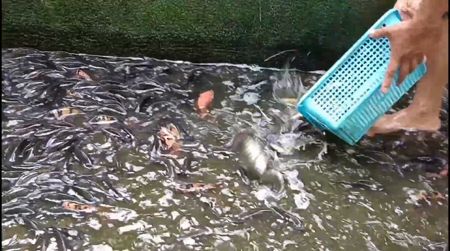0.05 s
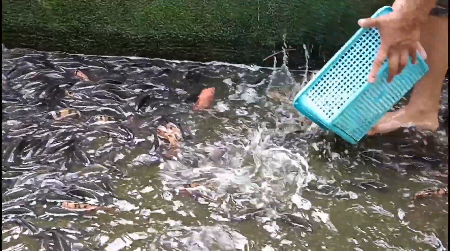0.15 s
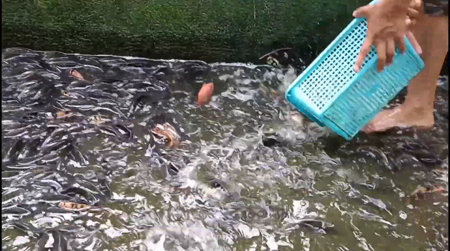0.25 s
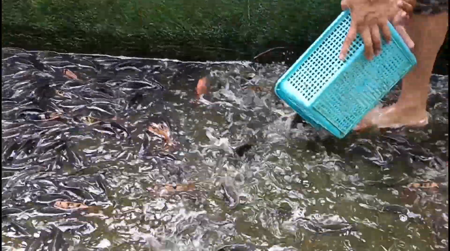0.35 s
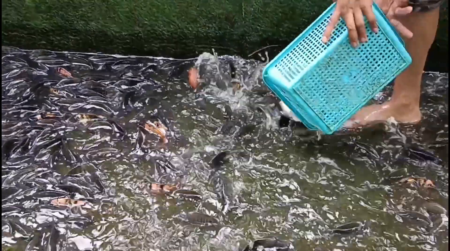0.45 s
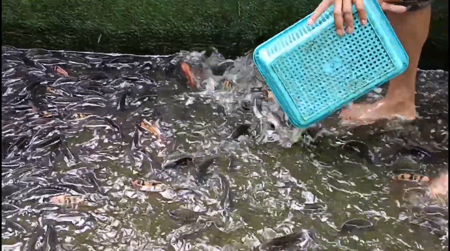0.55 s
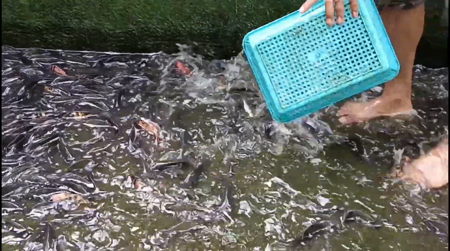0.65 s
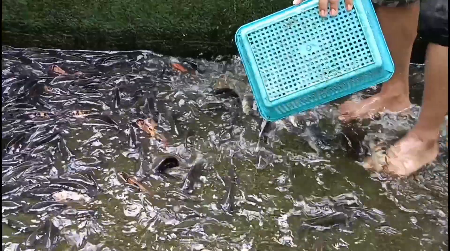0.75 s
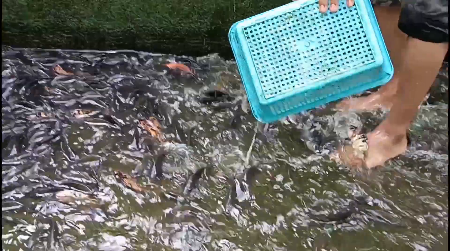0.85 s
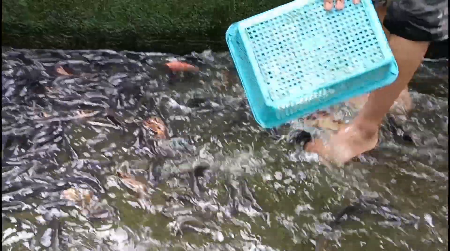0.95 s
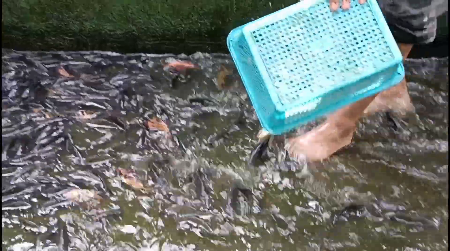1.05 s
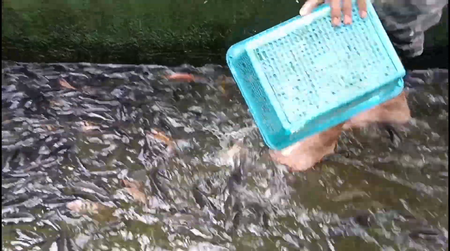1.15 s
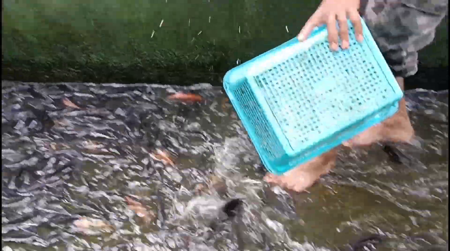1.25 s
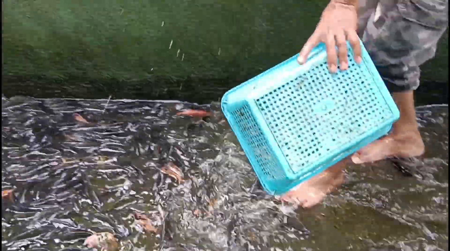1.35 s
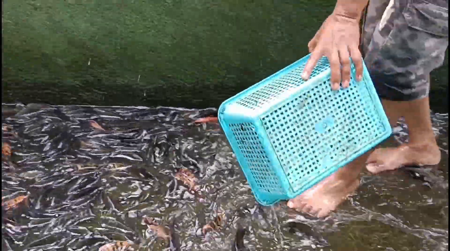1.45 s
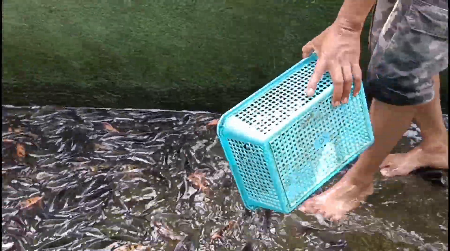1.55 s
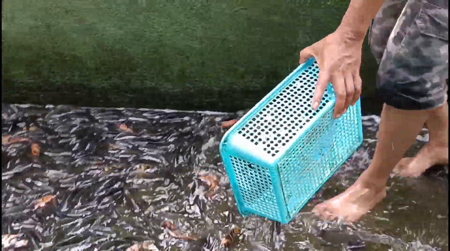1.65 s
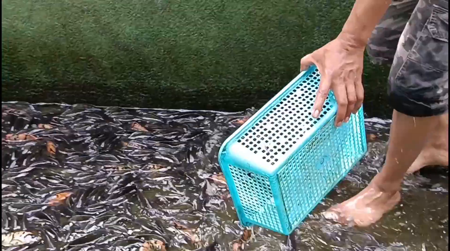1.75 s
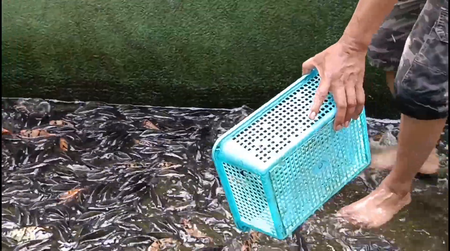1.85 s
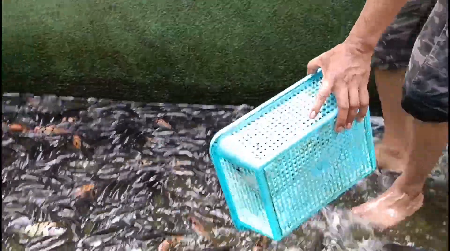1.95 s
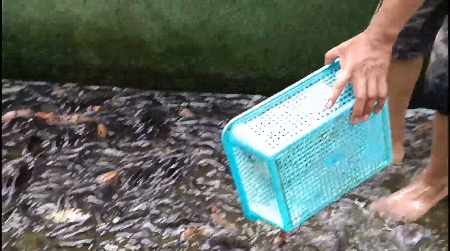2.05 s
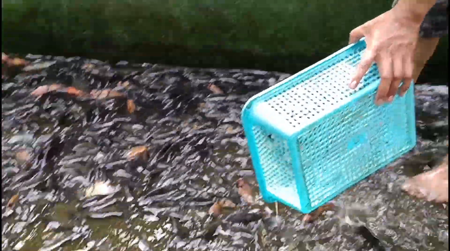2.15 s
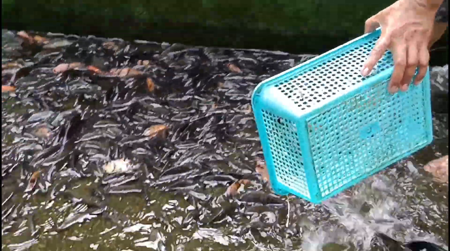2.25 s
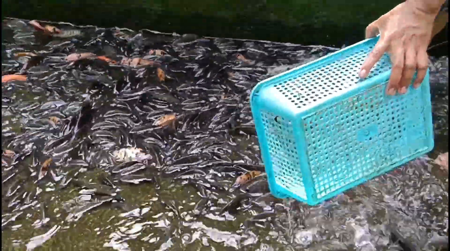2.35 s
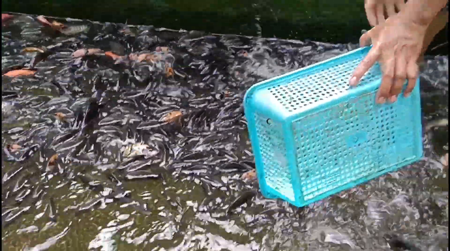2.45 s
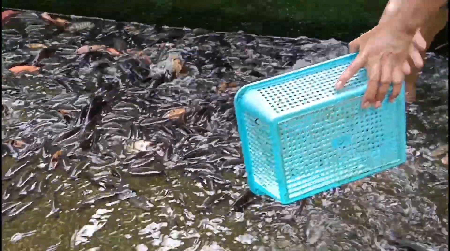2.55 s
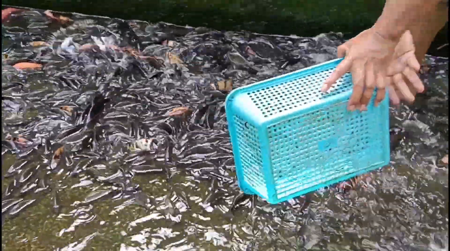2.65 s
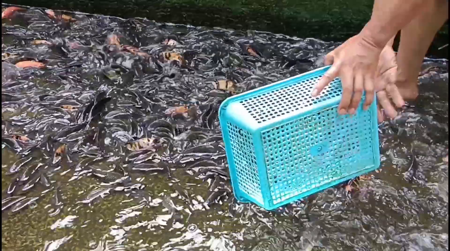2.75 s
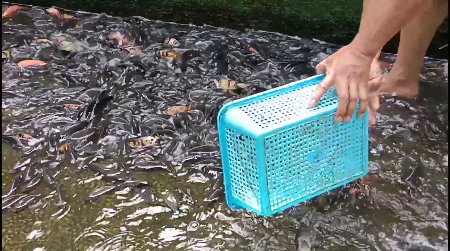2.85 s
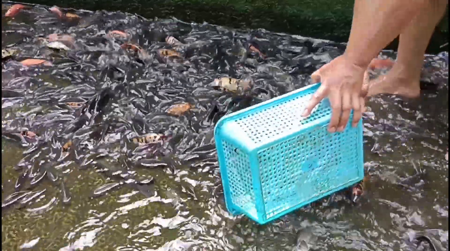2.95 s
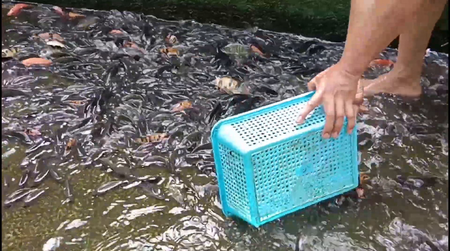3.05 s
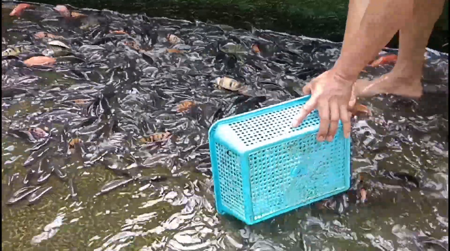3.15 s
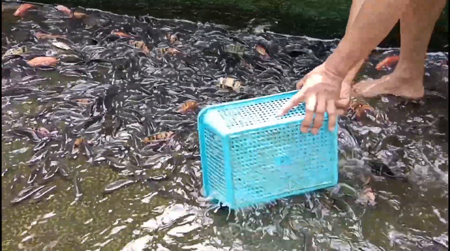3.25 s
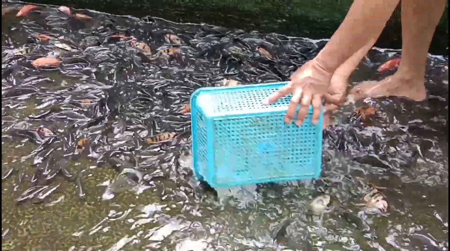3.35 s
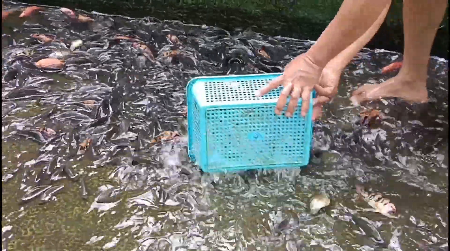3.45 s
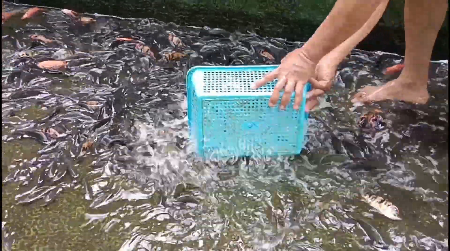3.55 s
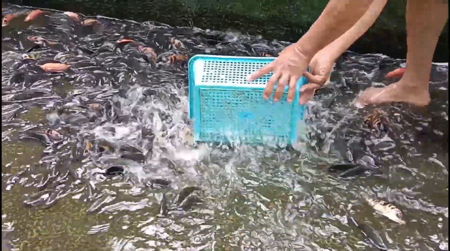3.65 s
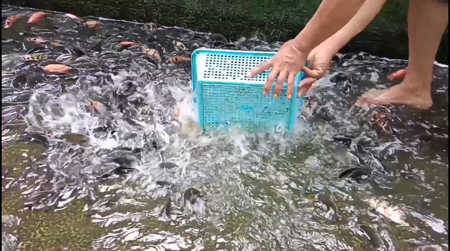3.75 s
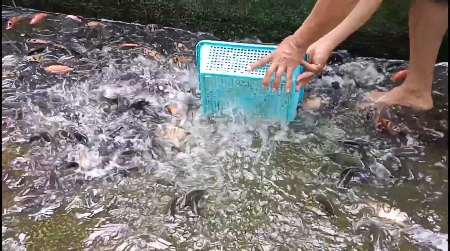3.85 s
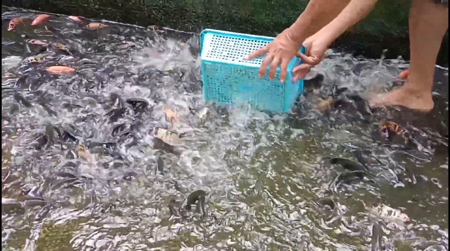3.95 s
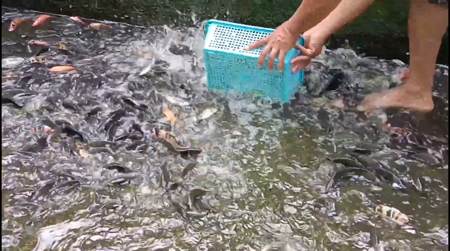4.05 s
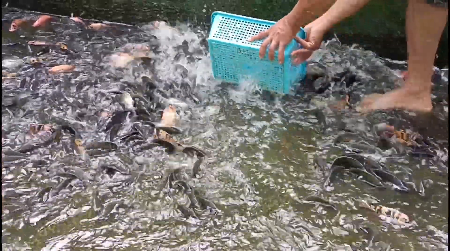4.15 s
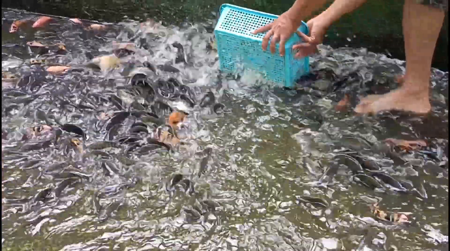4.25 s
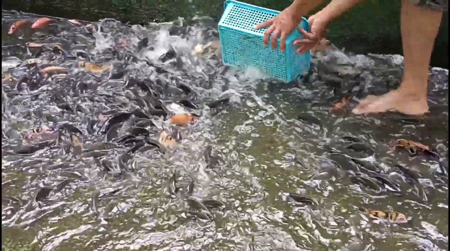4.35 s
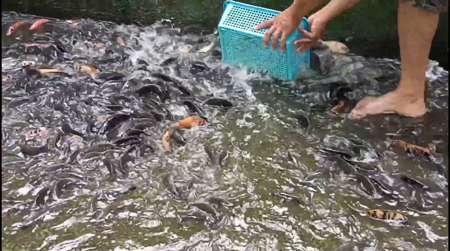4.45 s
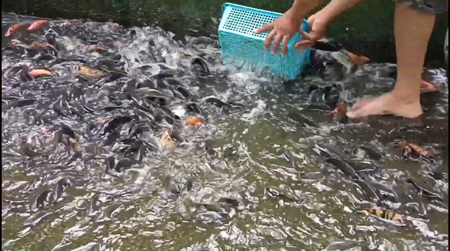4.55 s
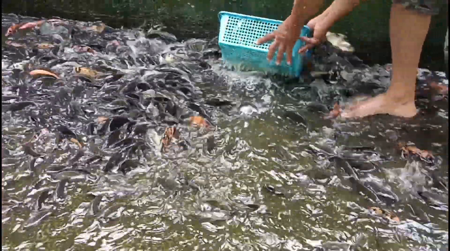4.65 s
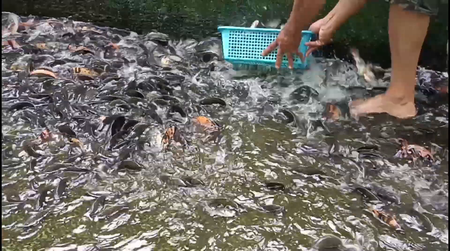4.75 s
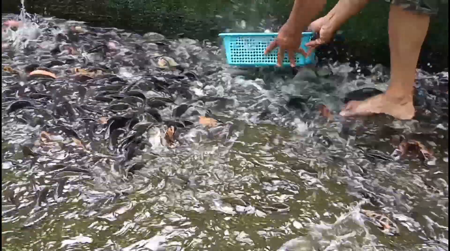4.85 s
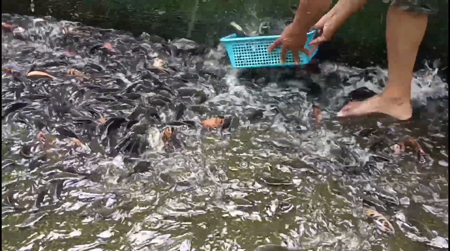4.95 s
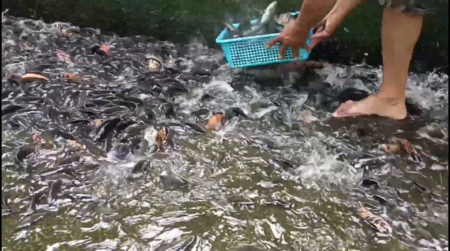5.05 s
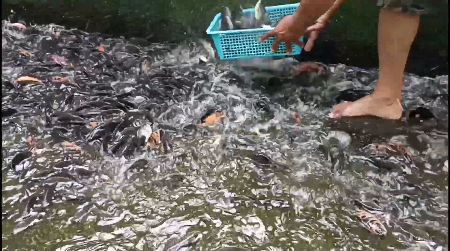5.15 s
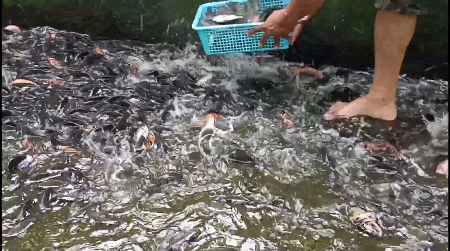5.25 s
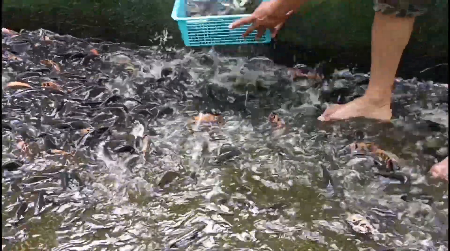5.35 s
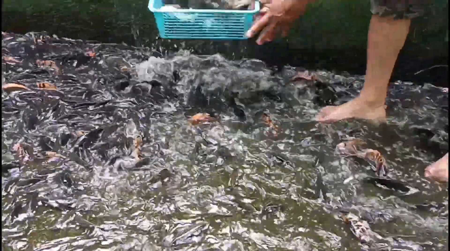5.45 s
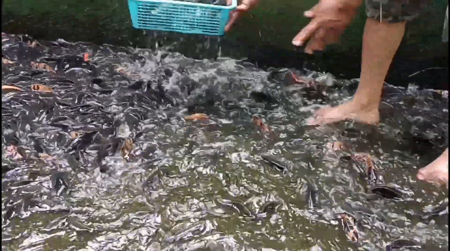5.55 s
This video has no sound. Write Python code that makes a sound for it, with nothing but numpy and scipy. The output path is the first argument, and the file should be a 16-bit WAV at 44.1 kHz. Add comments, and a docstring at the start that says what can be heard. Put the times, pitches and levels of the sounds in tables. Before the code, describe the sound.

From the start, crowded fish thrash in a shallow concrete pond, heard from nearby on a hand-held camera microphone. The splashing is continuous, thin and bright: hissing spray, falling drops and small bubbles, with irregular sharp tail slaps, quick fizzes and occasional plops. Echoes off the walls are very short, and faint dull thuds come through the floor. Soft swirls of water pass in the first second or so. Between about 1.6 and 2 seconds the splashing eases and a faint, high, wavering whistle sounds. The slapping then picks up again. From about 3.4 seconds a plastic basket is pushed through the fish and lifted, making a low, lumpy slosh that swells at 3.7 seconds with deeper plops. The thrashing grows louder and fuller with it. The slosh is heaviest around 4.7 seconds, and strong spray and slaps continue to the end at about 5.6 seconds.

```python
"""Crowded fish thrash in a shallow concrete pond, making spray, falling drops, bubbles and tail slaps.
Spray hisses, trapped air rings and dull thuds come through the floor; a faint whistle sounds in a lull.
From about 3.4 s a plastic basket is pushed through the fish and lifted, sloshing heavy water.
Until then the sound is thin: little is left under an edge that wanders around 1 kHz.
It all reaches the two unlike microphone ports of a hand-held camera."""
import sys
import numpy as np
from scipy import signal
from scipy.io import wavfile
from scipy.ndimage import uniform_filter1d

SR = 44100
rng = np.random.default_rng(int(sys.argv[2]) if len(sys.argv) > 2 else 0)


def to_wav(sig):
    """Store sig (one row per channel, or 1-D mono) as 16-bit WAV at the path in sys.argv[1].

    Samples outside -1..1 are clipped; the rate is SR.
    """
    pcm = np.clip(np.atleast_2d(sig), -1, 1) * 32767
    pcm = np.round(pcm).astype(np.int16)
    wavfile.write(sys.argv[1], SR, pcm.T)  # frames by channels


N = 246959

# How the thrashing changes: t/s, level/dB, treble boost/dB, body boost/dB, low edge/Hz
THRASHING = [(0.0, -33.5, -2, -9, 1280), (.14, -36, 1.5, -3, 1460), (.2, -34.5, 1.5, -1, 990),
             (.3, -31.5, -2.5, 3.5, 780), (.4, -34, -3, 2, 840), (.56, -36.5, 0, 1.5, 730),
             (.72, -35.5, 0, -3, 1090), (.84, -37.5, 0, 0, 1290), (.9, -38, -2, 1, 855),
             (1.05, -38, 2.5, 2.5, 790), (1.085, -33.5, -2, 6.5, 810), (1.2, -35, -1.5, -4.5, 680),
             (1.3, -37, 0.5, 0, 940), (1.5, -36.5, -4.5, -7, 1010), (1.63, -41, 1, -5, 1320),
             (1.8, -40.5, 3.5, -9, 1280), (1.92, -43.5, 5.5, -2.5, 1350), (2.03, -41.5, 3.5, -2, 1450),
             (2.07, -34.5, -6, 1, 1066), (2.17, -41.5, 2.5, -3, 980), (2.26, -38.5, -1.5, -3.5, 1300),
             (2.4, -37, -2, -2, 990), (2.53, -34.5, -6.5, 2.5, 700), (2.72, -33, -2, -1.5, 1030),
             (2.9, -38, -1.5, 0, 985), (3.04, -36, 0.5, -4, 1020), (3.17, -43, -1, -3, 1320),
             (3.235, -38, 1, -5, 1010), (3.27, -36, -5.5, 1.5, 970), (3.43, -35, -0.5, -1, 990),
             (3.56, -34.5, -4, 4, 790), (3.67, -29.5, -1.5, 2.5, 690), (4.3, -30.5, 0, 2.5, 626),
             (4.62, -31.5, -1.5, 1, 710), (4.89, -28, -0.5, -2, 600), (5.02, -31, 2, 0.5, 610),
             (5.25, -27, 0.5, -3, 665), (5.4, -30, 3.5, -0.5, 740), (5.6, -28.5, 2, -6, 740)]
# Heavy water pushed by the basket: t/s, level/dB, deep bass boost/dB
BASKET_PUSH = [(0.0, -73.5, -8), (3.34, -76.5, -2.5), (3.385, -43.5, -27), (3.47, -58, -12),
               (3.58, -55, -28), (3.655, -36.5, -22), (4.15, -40.5, -26), (4.23, -35, -17),
               (4.5, -38.5, -10.5), (4.7, -32.5, -4.5), (4.85, -38, -7.5), (5.07, -34, -16),
               (5.24, -37, -5.5), (5.36, -37, -10.5), (5.44, -45.5, -0.5), (5.6, -45, -5)]


def amp(db):
    return 10 ** (np.asarray(db) / 20)


def unit_level(x):
    return x / np.sqrt(np.mean(x ** 2) + 1e-20)


def at_pitch(points, hz):
    f, value = np.transpose(points)
    return np.interp(np.log(hz + 1), np.log(f + 1), value)


def at_time(rows, t):
    times, *columns = np.transpose(rows)
    return [np.interp(t, times, column) for column in columns]


def pan(left_minus_right_db):
    return amp(np.array([left_minus_right_db, -left_minus_right_db]) / 2)


def wobble(shape, size):
    """Smooth random drift; a bigger size drifts more slowly."""
    return unit_level(uniform_filter1d(rng.standard_normal(shape), size))


def add_at(mix, start_s, sound):
    part = mix[:, round(start_s * SR):][:, :sound.shape[1]]
    part += sound[:, :part.shape[1]]


def fade(t, t60, rise_s):
    """Rises quickly and falls by 60 dB every t60 seconds."""
    return amp(-60 * t / t60) * (1 - np.exp(-t / rise_s))


def filtered(x, gain, size):
    """Turns each pitch at each moment up or down by gain(hz, t)."""
    frames = dict(fs=SR, nperseg=size, noverlap=size * 3 // 4)
    hz, t, spectra = signal.stft(x, **frames)
    return signal.istft(spectra * gain(hz[:, None], t), **frames)[1][..., :N]


def water_noise(patchy_db, flicker_db, size):
    """Stereo hiss with drifting patches and a flicker that all pitches share."""
    # How alike the two sides are: f/Hz, likeness/0-1
    likeness = [(60, 0.78), (180, 1), (550, 0.58), (1650, 0.42), (4970, 0.07), (15000, 0.0)]
    left, other = rng.standard_normal((2, N))
    bins, frames = size // 2 + 1, N * 4 // size + 8
    patches = unit_level(uniform_filter1d(wobble((bins, frames), size=12), size=5, axis=0))
    flicker = wobble(frames, size=4)
    gain = lambda hz, t: amp(patchy_db * patches + flicker_db * flicker)[:, :len(t)]
    alike = lambda hz, t: np.clip(at_pitch(likeness, hz), 0, .99)
    unlike = lambda hz, t: np.sqrt(1 - alike(hz, t) ** 2)
    right = filtered(left, alike, size=1024) + filtered(other, unlike, size=1024)
    return unit_level(filtered(np.array([left, right]), gain, size))


def bubble(hz, cycles, rise=0.0876):
    """An air pocket rings, shrinking so that its pitch climbs."""
    turns = np.arange(int(3 * cycles * SR / hz) + 4) * hz / SR
    note = np.sin(2 * np.pi * turns * (1 + rise * turns / cycles))
    ring = note * np.exp(-2 * turns / cycles) * (1 - np.exp(-4 * turns))
    return ring / np.linalg.norm(ring)


def bubble_cloud(lo_hz, hi_hz, cycles, per_s, spread_db, busy, sizes):
    """Many bubbles, each size at its own place in the pond; a few are loud."""
    out = np.zeros((2, N))
    for hz in np.geomspace(lo_hz, hi_hz, sizes):
        pops = 1. * (rng.random(N) < busy * per_s / sizes / SR)
        pops[pops > 0] = amp(spread_db * np.minimum(rng.exponential(1, int(pops.sum())), 3.2))
        ring = bubble(hz, cycles * rng.uniform(1.0, 1.86))
        sound = signal.oaconvolve(pops, ring)[:N] * np.sqrt(hz)
        place = rng.uniform(-1, 1)  # the far side is quieter and later
        out += pan(4 * place)[:, None] * np.array([sound, np.roll(sound, int(14 * place))])
    return unit_level(out)


def wall_echoes(x, t60):
    """Short echoes off the water and pond walls, different on each side."""
    t = np.arange(int(t60 * SR)) / SR
    echoes = rng.standard_normal((2, len(t))) * (rng.random((2, len(t))) < .06)
    echoes *= amp(-60 * t / t60) * (t > .001)
    return signal.oaconvolve(x, echoes / np.linalg.norm(echoes[0]), axes=1)[:, :N]


def thrashing():
    """Spray hiss, drops and bubbles; they come in clumps as fish flip."""
    busy = amp(3 * wobble(N, size=900))
    busy /= busy.mean()
    drops = amp(-6) * bubble_cloud(883, 14750, cycles=1.7, per_s=3000, spread_db=6.2, busy=busy, sizes=26)
    drops += amp(-16.5) * bubble_cloud(800, 3644, 13.2, 200, 3.4, busy, sizes=16)  # longer rings
    drops += amp(-8) * bubble_cloud(7600, 16000, 0.7, 270, 4.8, busy, sizes=4)  # tiny clicks
    hiss = water_noise(patchy_db=2.73, flicker_db=0.67, size=256)
    water = amp(12.5) * hiss + amp(11.5) * drops + amp(9.5) * wall_echoes(drops, t60=.05)

    def tone(hz, t):
        level_db, treble_db, body_db, _ = at_time(THRASHING, t)
        treble = np.clip(np.log2(hz / 5500 + 1e-9), 0, 1)
        body = np.clip(np.log2(2900 / (hz + 1)), 0, 1)
        return amp(level_db + treble * treble_db + body * body_db) * pan(-0.3)[:, None, None]
    return filtered(water, tone, size=512)


def swirls():
    """Water swirls around the feet in short rushes, each near one pitch."""
    # Swirls: t/s, length/s, level/dB, f/Hz
    rushes = [(0.0, 0.037, -59, 326), (.17, 0.068, -62.5, 330), (0.299, .09, -60, 600),
              (1.091, 0.16, -61, 583), (2.418, .14, -71.5, 470), (3.429, .17, -51.5, 690)]
    out = np.zeros((2, N))
    for start, length, db, hz in rushes:
        t = np.arange(0, length, 1 / SR)
        shared, left, right = rng.standard_normal((3, len(t)))
        band = signal.butter(2, [0.8 * hz, 1.33 * hz], "band", fs=SR, output="sos")
        rush = unit_level(signal.sosfilt(band, shared + .4 * np.array([left, right])))
        add_at(out, start, amp(db) * np.sqrt(2) * np.sin(np.pi * t / t[-1]) * rush)
    return out


def droplet_burst(t, t60, rise_s, ragged_db):
    """A dying rush of droplets, partly alike on both sides."""
    shared, left, right = rng.standard_normal((3, len(t)))
    ragged = amp(ragged_db * wobble(len(t), size=40))
    return unit_level((.5 * shared + np.array([left, right])) * ragged) * fade(t, t60, rise_s)


def tail_slaps(t60=0.037):
    """A tail hits the water: a smack, then a dull splat with trapped air ringing in it."""
    # Slaps: t/s, relative level/dB, air pocket f/Hz, ring boost/dB
    slaps = [(0.061, -15.5, 2540, -3.5), (0.1446, -16, 2790, -1.5), (0.2017, -23, 2640, -7.5),
             (0.2492, -30, 1210, 7), (0.333, -20, 1650, 1), (0.3517, -22, 1830, 5),
             (0.4403, -18, 1829, -0.5), (0.5294, -19, 1730, 0), (0.7226, -17.5, 2610, 1),
             (0.7945, -18, 2760, -9), (1.062, -12.5, 2930, -6.5), (1.075, -14.5, 1090, 2.5),
             (1.286, -27.5, 1580, 6.5), (1.3123, -15.5, 3120, -8), (1.457, -14, 2850, -0.5),
             (1.5434, -28, 3540, 5), (1.664, -19.5, 2980, -5.5), (2.0498, -13.5, 1610, -17),
             (2.2021, -14, 2480, -15), (2.2934, -12.5, 2950, -21), (2.385, -23.5, 1344, 2.5),
             (2.5113, -28, 2818, -3), (2.768, -17, 2050, -6), (2.8776, -24, 1156, 4),
             (2.915, -18, 2010, -4.5), (3.023, -15.5, 2990, -12), (3.2472, -15.5, 2170, -4),
             (3.2925, -26, 3100, 4), (3.341, -18.5, 3440, -4), (3.5741, -26.5, 3000, 9.5),
             (4.0988, -12.5, 1166, -2), (4.1814, -20, 3230, -4), (4.2444, -14, 1180, -3),
             (4.443, -10.5, 3050, -14), (4.573, -20, 2960, 1), (4.7096, -12.5, 2030, -10),
             (4.8572, -24, 3160, 8), (4.9658, -28, 1180, 5), (5.0394, -15.5, 1524, -3),
             (5.1165, -19, 2750, -8), (5.2253, -19, 2700, -8), (5.396, -16, 3080, -21),
             (5.443, -20, 3000, -8), (5.5794, -34, 3190, -4)]
    out, t = np.zeros((2, N)), np.arange(0, .12, 1 / SR)
    dull = signal.butter(2, [1000, 6500], "band", fs=SR)
    smack = 1 + amp(-1.5 - 60 * t / 0.0034)
    for start, db, hz, ring_db in slaps:
        splat = droplet_burst(t, t60, rise_s=0.00082, ragged_db=4.3) * smack
        ring = amp(ring_db) * np.sin(2 * np.pi * hz * t * (1 + 3 * t)) * fade(t, t60, rise_s=0.00081)
        add_at(out, start, amp(db) * (amp(4.5) * signal.lfilter(*dull, splat) + ring))
    return out


def spray_ticks():
    """Spray thrown close by makes short, bright fizzes."""
    # Ticks: t/s, relative level/dB
    ticks = [(0.0616, -14.5), (0.1155, -26), (0.171, -14), (0.2117, -11), (0.385, -22), (0.574, -13.5),
             (1.1383, -15), (1.2477, -15), (1.393, -19.5), (1.4554, -17), (1.5061, -21.5), (1.5454, -16.5),
             (1.662, -15.5), (1.707, -18), (1.785, -13), (1.927, -21.5), (1.9866, -16), (2.1785, -17),
             (2.3967, -18), (2.594, -19.5), (2.7182, -21), (2.7661, -19), (2.97, -22), (3.0034, -20),
             (3.3725, -20.5), (4.153, -17), (4.3979, -21), (4.4697, -12.5), (4.6882, -12), (4.8219, -17.5),
             (4.8473, -13.5), (4.8963, -18.5), (5.022, -17), (5.1135, -10.5), (5.1587, -13), (5.1771, -12),
             (5.2016, -13), (5.2993, -22), (5.4278, -12.5), (5.5383, -14), (5.5823, -16)]
    out, t = np.zeros((2, N)), np.arange(0, .12, 1 / SR)
    bright = signal.butter(2, 6500, "high", fs=SR)
    for start, db in ticks:
        fizz = droplet_burst(t, t60=0.021, rise_s=0.0006, ragged_db=3.8)
        add_at(out, start, amp(db + 12) * signal.lfilter(*bright, fizz))
    return out


def floor_thuds(swell_s=0.041, fade_s=.014):
    """Dull thuds come through the pond floor, over a faint rumble that grows with the basket's push."""
    # Thuds: t/s, length/s, level/dB
    thuds = [(.071, 0.018, -58), (.6, 0.042, -60), (1.35, .035, -58), (1.42, 0.084, -64), (1.57, .1, -66),
             (2.583, 0.042, -59), (2.64, 0.044, -74), (2.743, .05, -70), (2.966, .025, -68),
             (3.1, .04, -77), (3.333, .15, -62), (3.59, .08, -55), (3.74, .04, -61), (3.91, .11, -58),
             (4.32, 0.54, -55), (4.9, 0.045, -58), (5.04, 0.32, -58), (5.48, 0.084, -54)]
    # Tone of the floor: f/Hz, level/dB
    floor_tone = [(25, -35), (60, -10), (95, 1), (120, 6.5), (160, -24.5), (400, -32)]
    t = np.arange(N) / SR
    noise = water_noise(patchy_db=3.4, flicker_db=0.32, size=2048)
    rumble = unit_level(filtered(noise, lambda hz, t: amp(at_pitch(floor_tone, hz)), size=2048))
    strength = amp(-80.5) + amp(at_time(BASKET_PUSH, t)[0] - 35.5)
    for start, length, db in thuds:
        swell = np.clip((t - start) / swell_s + .5, 0, 1)
        strength += amp(db) * swell * np.exp(-np.maximum(t - start - length, 0) / fade_s)
    return strength * rumble


def plops():
    """Big pockets of air close and ring, wobbling, with a climbing note."""
    # Large bubbles: t/s, relative level/dB, f/Hz
    pockets = [(0.322, -33, 866), (0.505, -32, 1182), (0.53, -32, 1070), (0.887, -32.5, 1025),
               (1.073, -39, 1075), (1.727, -51, 956), (1.788, -55.5, 770), (1.81, -51, 970),
               (2.381, -35, 1258), (2.517, -40, 1210), (2.878, -44, 1184), (3.598, -33, 1284),
               (3.661, -35.5, 513), (3.655, -35, 980), (3.909, -33, 356), (3.934, -43, 335),
               (3.948, -26, 1167), (4.046, -30, 1184), (4.679, -38, 300), (4.7, -40, 427),
               (4.969, -37, 416), (5.041, -38, 520)]
    out, t = np.zeros((2, N)), np.arange(0, .2, 1 / SR)
    soft_start = np.minimum(t / 0.00415, 1) ** 2  # the pocket closes without a knock
    shape = soft_start * fade(t, t60=0.064, rise_s=0.0017)
    for start, db, hz in pockets:
        note = np.sin(2 * np.pi * hz * t * (1 + 1.6 * t)) * amp(0.72 * wobble(len(t), size=150))
        add_at(out, start, 2.4 * amp(db) * shape * np.array([note, note]))
    return out + amp(6) * wall_echoes(out, t60=.06)


def whistle():
    """A faint high tone whose pitch and strength waver."""
    # Path of the whistle: t/s, f/Hz, level/dB
    path = [(1.6, 2950, -96), (1.7, 3090, -42.5), (1.76, 3350, -39), (1.85, 3320, -46), (1.95, 3280, -45),
            (2.05, 3280, -97)]
    hz, db = at_time(path, np.arange(N) / SR)
    wavering_hz = hz * (1 + 0.016 * wobble(N, size=500))
    return amp(db + 4.1 * wobble(N, size=700)) * np.sin(2 * np.pi * np.cumsum(wavering_hz) / SR)


def basket_slosh():
    """The basket shoves heavy water: a low, lumpy churn with big air pockets in it."""
    # Tone of the slosh: f/Hz, level/dB
    slosh_tone = [(110, -29), (170, 10), (250, 0.5), (320, -1), (520, 1.5), (640, -1), (720, -36),
                  (900, -48)]
    push = amp(at_time(BASKET_PUSH, np.arange(N) / SR)[0])
    gurgle = water_noise(patchy_db=1, flicker_db=1, size=1024)
    gurgle += amp(-21) * bubble_cloud(269.7, 612, 5.9, 120, 0.78, busy=0.82, sizes=8)
    churn = unit_level(filtered(gurgle, lambda hz, t: amp(at_pitch(slosh_tone, hz)), size=2048))
    deep = lambda hz: np.clip((290 - hz) / 60, 0, 1)
    slosh = filtered(churn, lambda hz, t: amp(at_time(BASKET_PUSH, t)[1] * deep(hz)), size=2048)
    lumpy = amp(2.15 * wobble(N, size=2000))
    return push * lumpy * slosh


def thinned(x, under_edge_db=-25.5, edge_width_hz=114):
    """Sound drops steeply under the wandering low edge, and further under 640 Hz."""
    def gain(hz, t):
        edge_hz = at_time(THRASHING, t)[-1]
        under = .5 - .5 * np.tanh((hz - edge_hz) / edge_width_hz)
        return amp(under_edge_db * under - 18.2 * (hz < 640))
    return filtered(x, gain, size=2048)


def scene():
    """The thinned surface splashing, with the other pond sounds added at full depth."""
    surface = thrashing()
    splashes = tail_slaps() + spray_ticks()
    surface += splashes + amp(-7) * wall_echoes(splashes, t60=.07)
    return thinned(surface) + plops() + whistle() + basket_slosh() + floor_thuds() + swirls()


def record(dry, top_hz=15550, cut_hz=16800):
    """Each port's hollow rings in its own way, colouring sound above 700 Hz; the top treble is cut."""
    # Tone of each microphone port: f/Hz, level/dB
    left_port = [(700, -6), (1200, -4.5), (2200, -3.5), (3100, 1.5), (3700, -9), (4400, -13), (5600, -1.5),
                 (6600, -15), (7900, -24.5), (9500, -16), (12300, -5), (14000, -11), (15300, -15.5)]
    right_port = [(700, -7.5), (1200, -5), (2000, -5), (3300, -7.5), (4500, -12.5), (5200, -9.5),
                  (6300, -14.5), (7700, -19), (8500, -19.5), (9100, -26), (10200, -22.5), (12000, -21),
                  (13800, -22.5), (15000, -40.5)]

    def ports(hz, t):
        colour_db = np.array([at_pitch(left_port, hz), at_pitch(right_port, hz)])
        return amp(colour_db * np.clip((hz - 640) / 120, 0, 1) - 40 * (hz > top_hz))
    heard = filtered(dry, ports, size=1024)
    treble_cut = signal.firwin(511, cut_hz, window=("kaiser", 9), fs=SR)
    return signal.oaconvolve(heard, treble_cut[None], "same")


dry = scene()
out = record(dry)
to_wav(out)
```